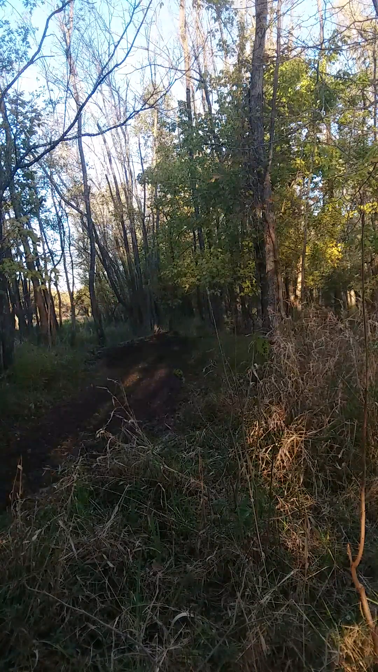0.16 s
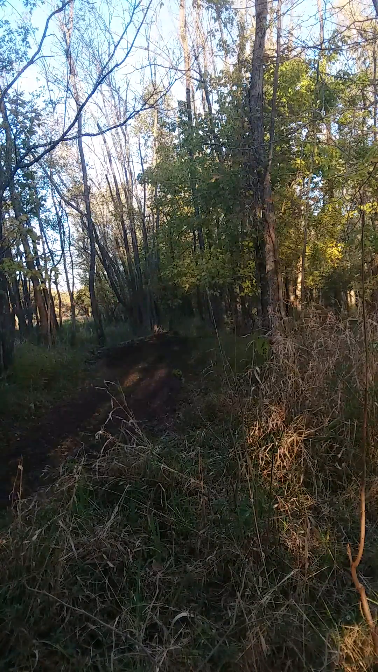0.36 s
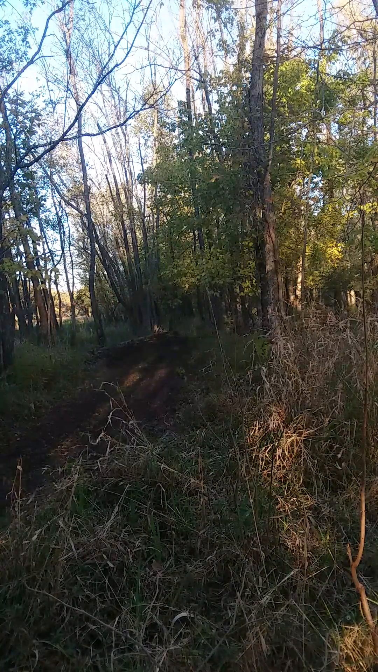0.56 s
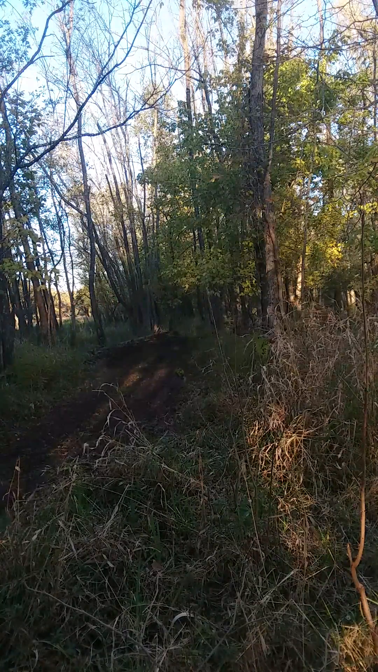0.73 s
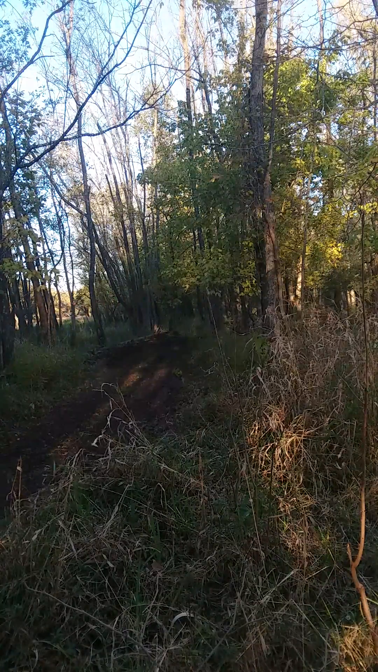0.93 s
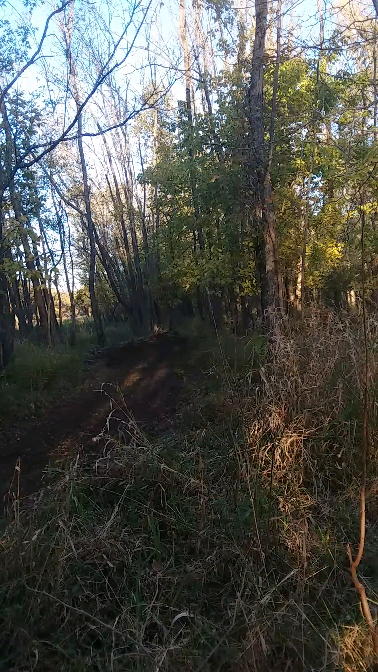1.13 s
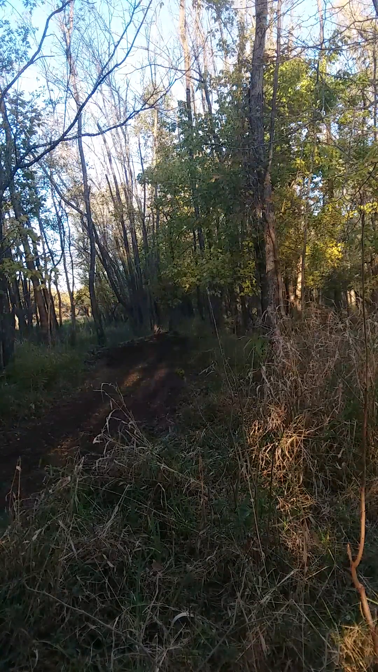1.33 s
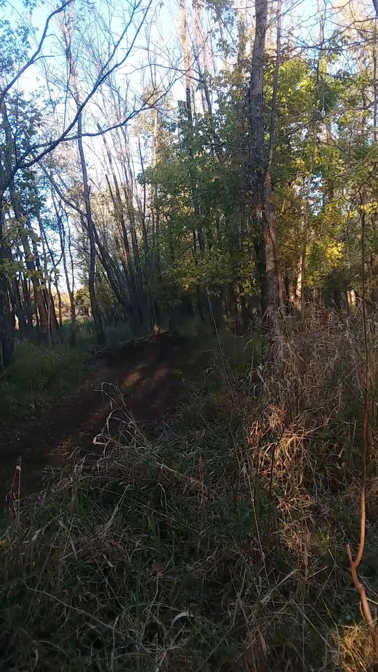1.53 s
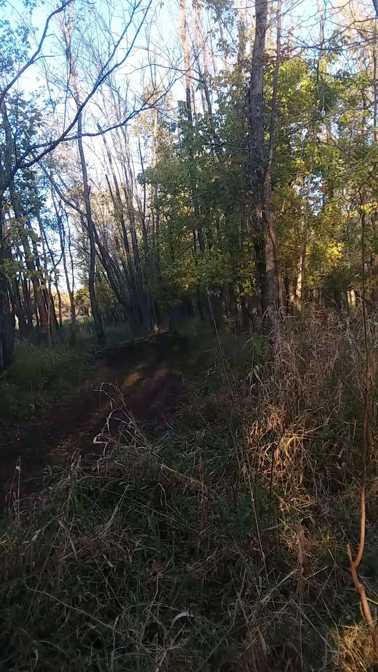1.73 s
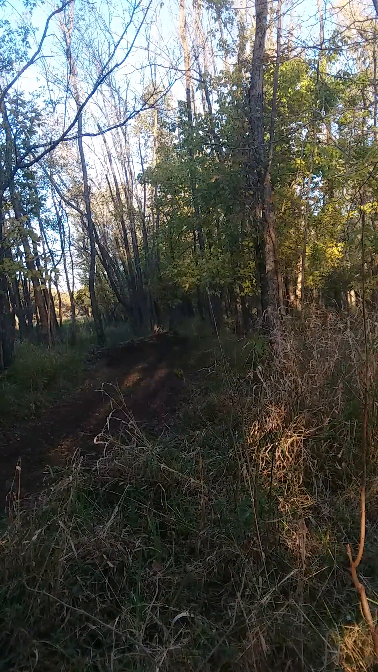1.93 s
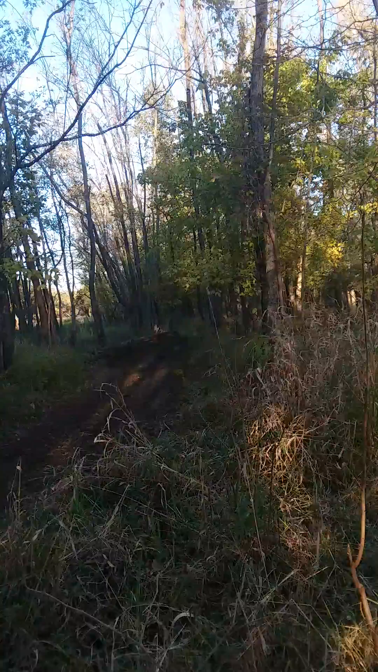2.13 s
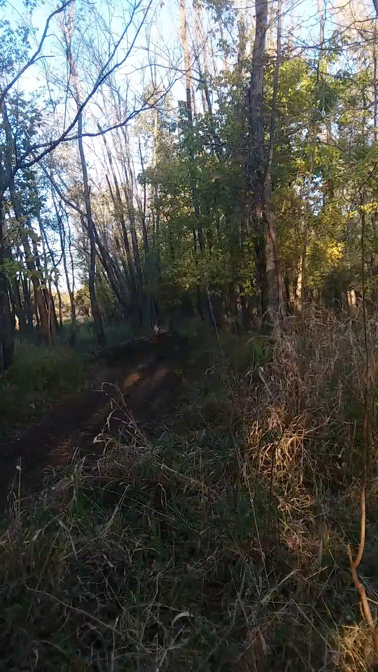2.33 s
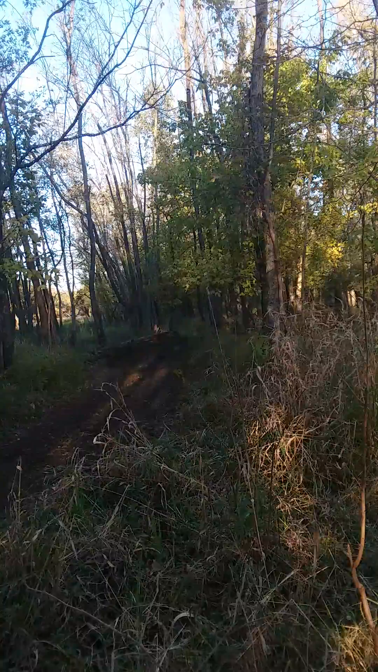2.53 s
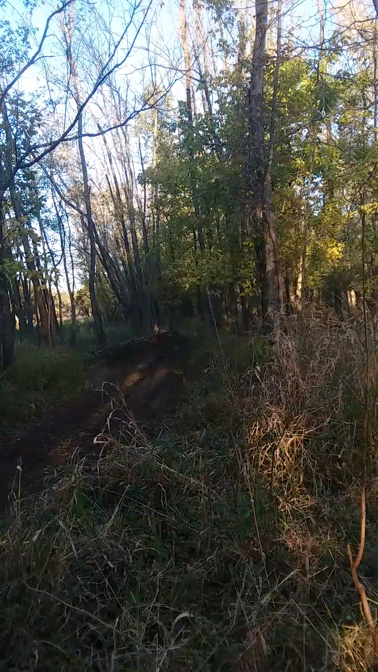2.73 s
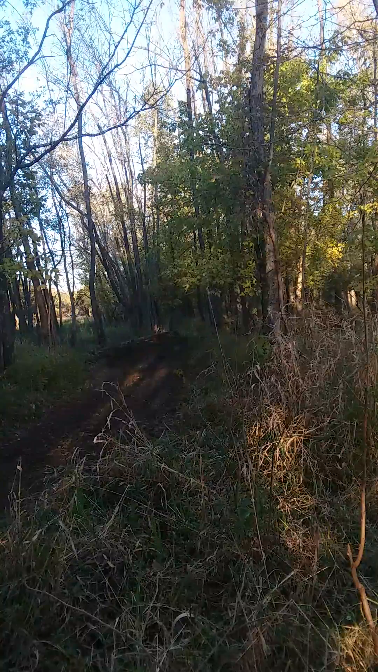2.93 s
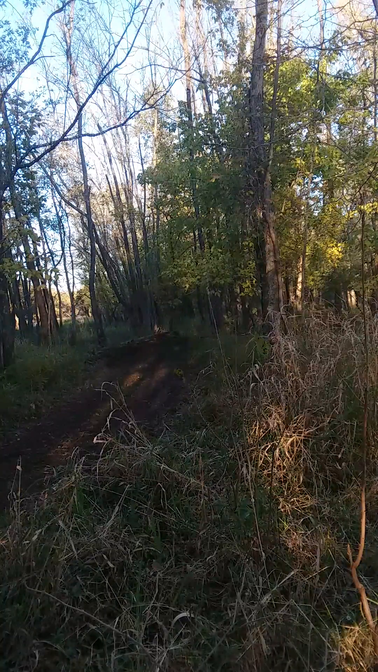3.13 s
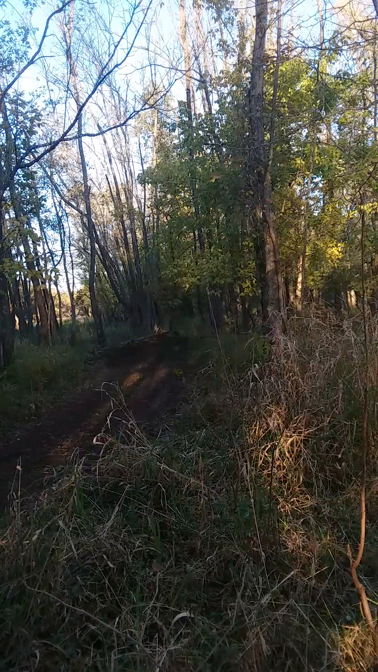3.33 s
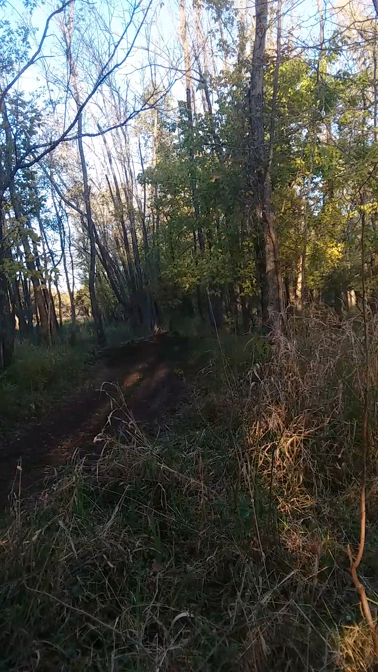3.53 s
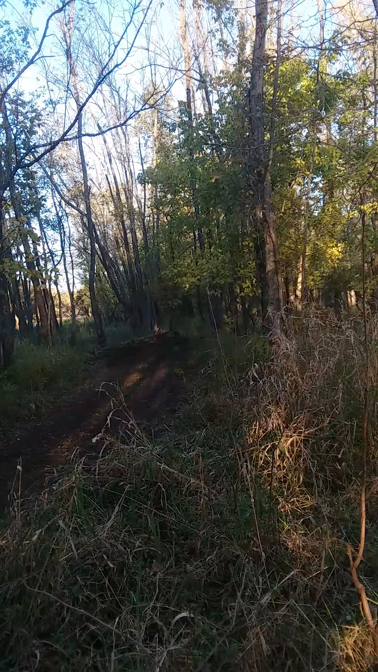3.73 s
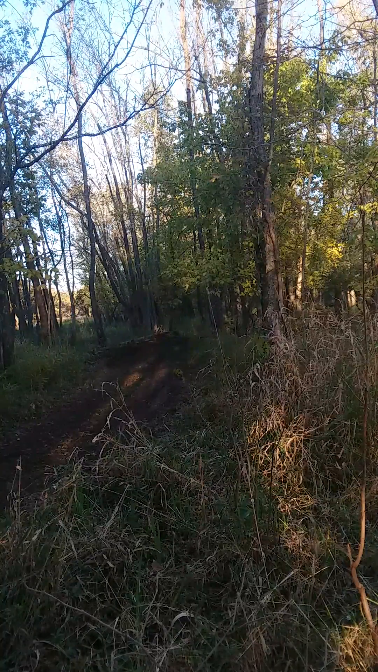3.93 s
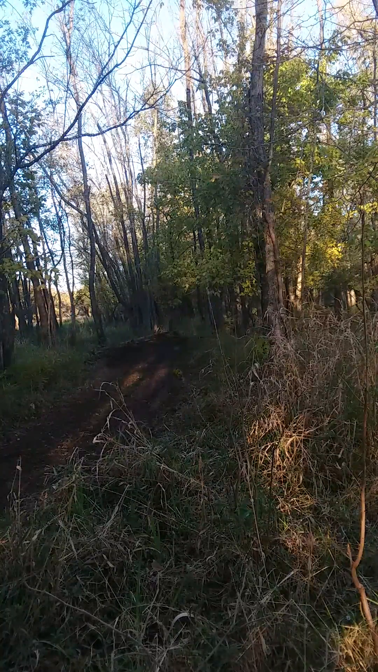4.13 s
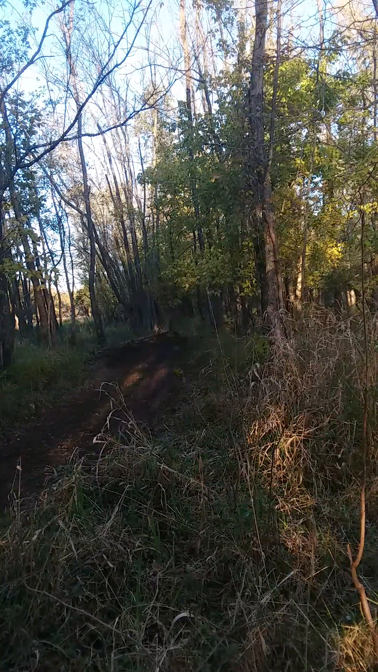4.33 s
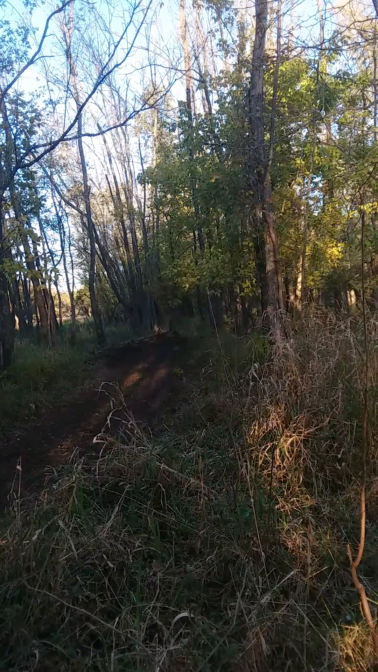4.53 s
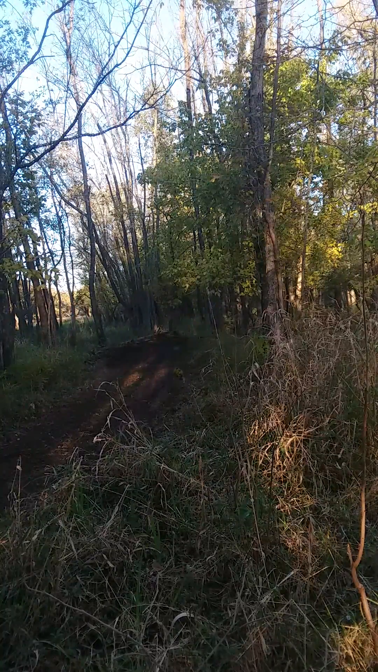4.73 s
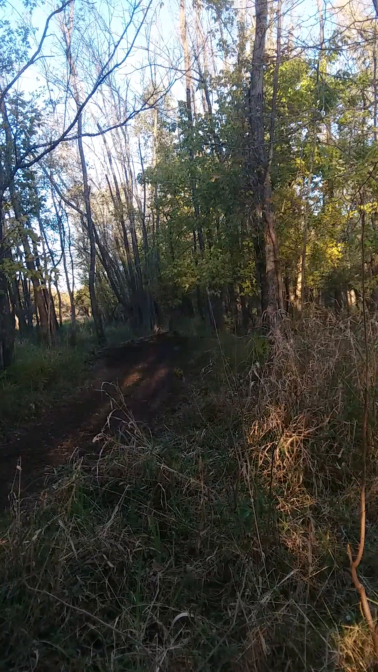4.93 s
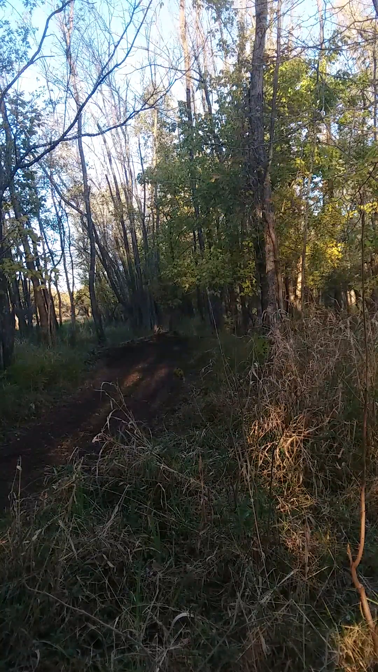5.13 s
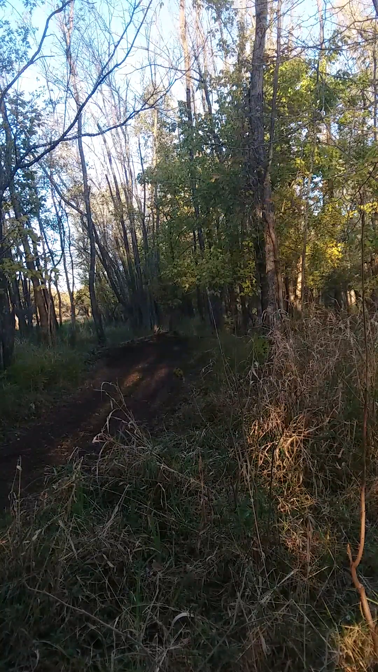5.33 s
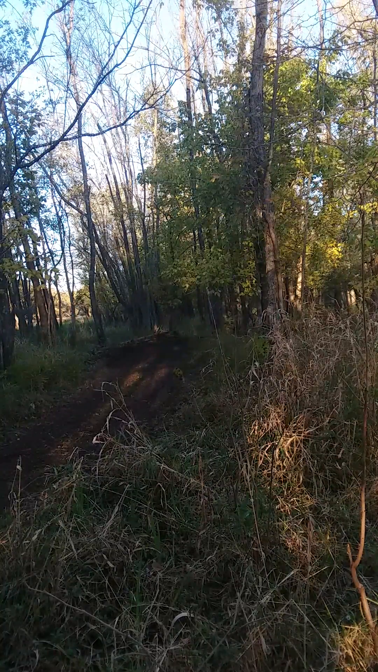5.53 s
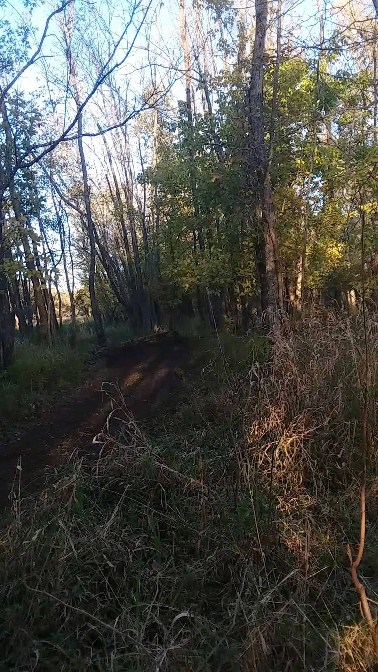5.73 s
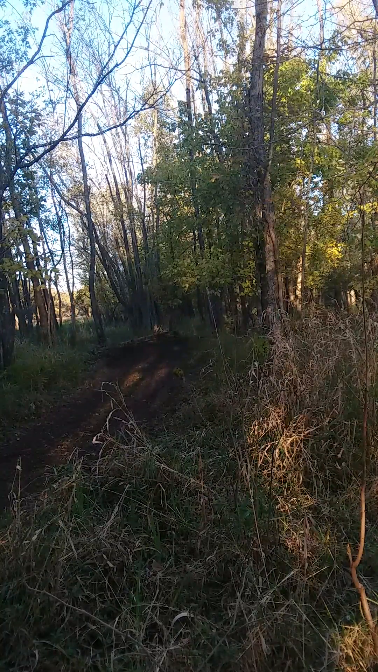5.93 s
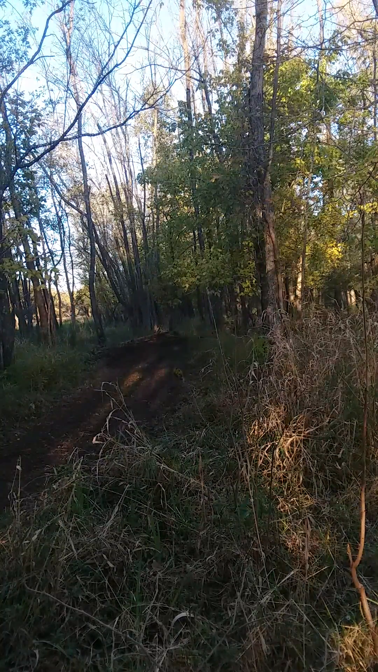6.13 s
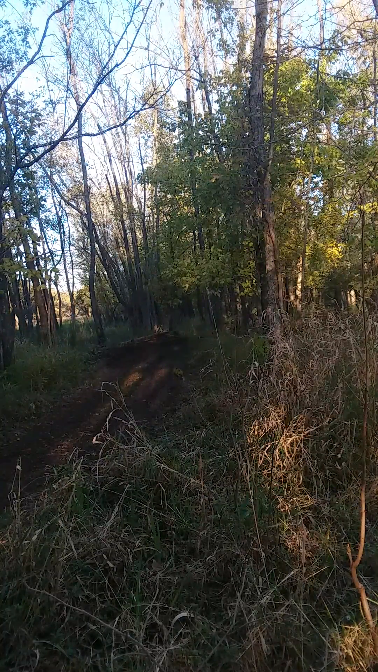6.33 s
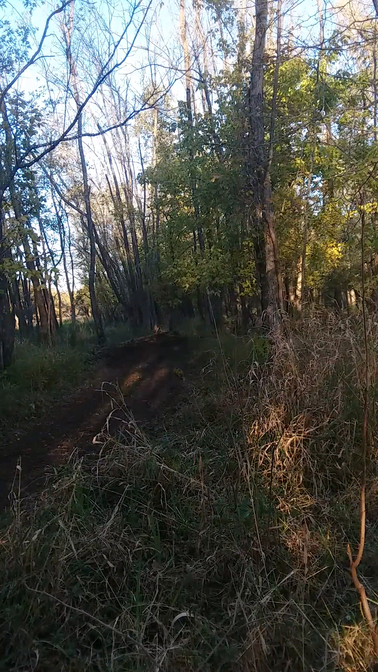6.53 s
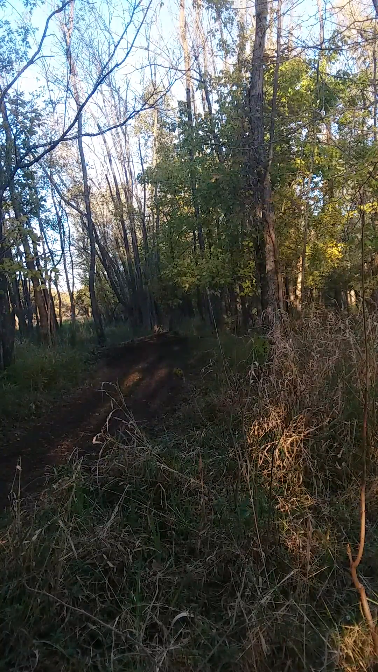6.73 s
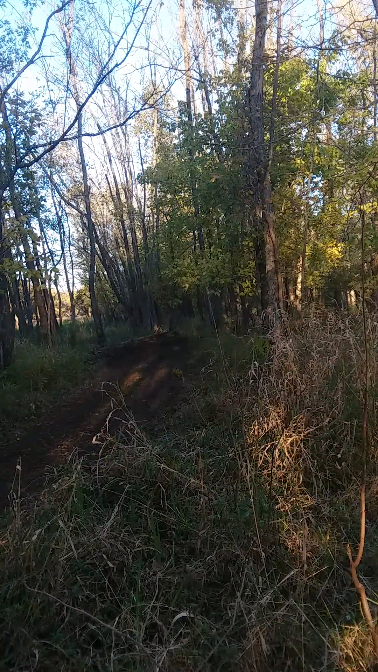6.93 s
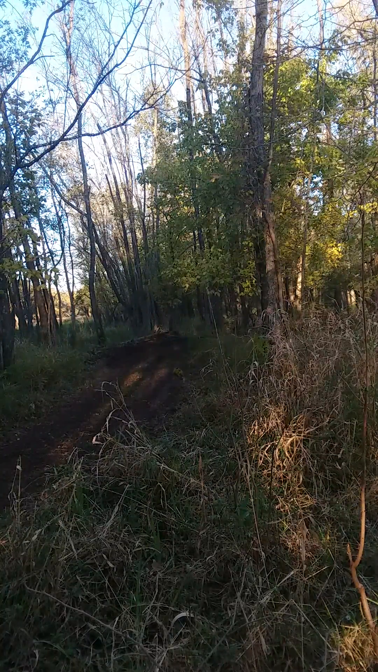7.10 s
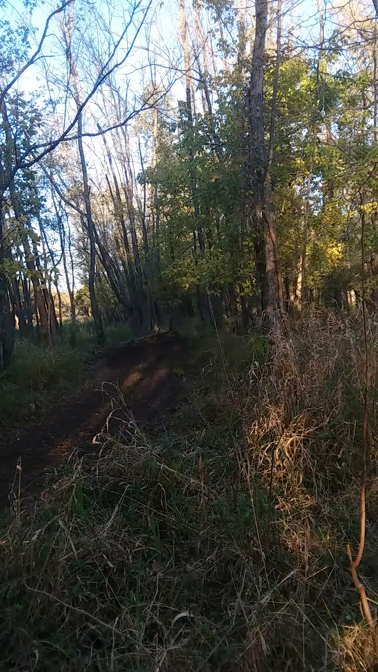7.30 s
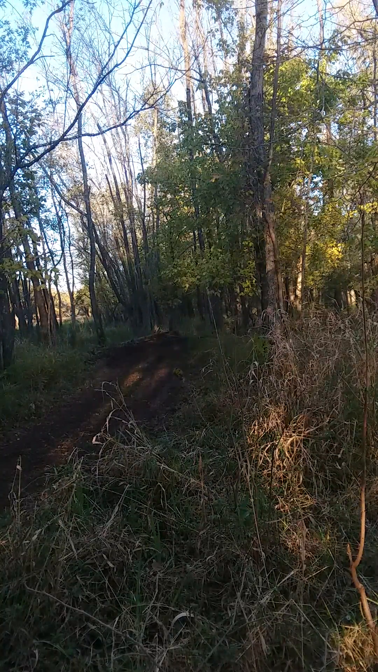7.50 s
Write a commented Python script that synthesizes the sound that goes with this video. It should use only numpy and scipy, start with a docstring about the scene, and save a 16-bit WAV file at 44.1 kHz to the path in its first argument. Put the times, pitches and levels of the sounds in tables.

```python
"""A dirt trail in the woods: a single-cylinder four-stroke quad passes 3 m from a stereo microphone.
Each firing rings the silencer and, under load, barks and spits at the tailpipe; trunks scatter the bark.
Chain, gears and tyres rustle beneath it, and a metal guard rings on the way past. From 2 s the tyres
throw dirt, then the gears whine. By 4 s the quad is 8 m off: the belt squeals, the drive grinds
briefly, and the engine labours on among the trees in bursts of throttle."""
import sys
import numpy as np
from scipy import signal
from scipy.fft import rfft, irfft, next_fast_len
from scipy.io import wavfile
from scipy.ndimage import uniform_filter1d, map_coordinates

SR = 44100
rng = np.random.default_rng(int(sys.argv[2]) if len(sys.argv) > 2 else 0)


def wrap_up_sound(samples):
    """Save the sound to the file named by the first command line argument, as 16-bit audio."""
    columns = np.atleast_2d(samples).T
    # keep every value between -1 and 1, then stretch to whole-number steps
    tamed = np.clip(columns, -1, 1)
    steps = np.round(tamed * 32767).astype(np.int16)
    wavfile.write(sys.argv[1], SR, steps)


N = 337806
TIME = np.arange(N) / SR
NEAR_M, FAR_M = 3, 8.5  # from the microphone: on the trail, in the trees
CRUISE_RATE = 25  # firings per s


def from_db(db):
    """Decibels to gain."""
    return 10 ** (np.asarray(db) / 20)


def curve(rows, at=TIME):
    """The columns of a table at the given times."""
    times, *columns = np.transpose(rows)
    return [np.interp(at, times, column) for column in columns]


def at_hz(points, hz):
    """Read a spectrum on a log-frequency axis."""
    f, value = np.transpose(points)
    return np.interp(np.log(hz + 1), np.log(f), value)


def colour(x, spectrum, size=4096):
    """Minimum-phase filter of unit energy, shaped by (f/Hz, level/dB) and falling away at both ends."""
    hz = np.arange(size // 2 + 1) * SR / size + 1
    ends = 1 / np.sqrt((1 + (spectrum[0][0] / hz) ** 6) * (1 + (hz / spectrum[-1][0] / 1.2) ** 8))
    cepstrum = irfft(np.log(from_db(at_hz(spectrum, hz)) * ends + 1e-5))
    cepstrum[1:size // 2] *= 2
    cepstrum[size // 2 + 1:] = 0
    response = irfft(np.exp(rfft(cepstrum)))
    return signal.fftconvolve(x, response[None] / np.linalg.norm(response), axes=-1)[:, :N]


# how alike the microphone's two sides are: f/Hz, correlation
LIKENESS = [(100, 1), (300, 1), (600, 0.98), (1200, 0.89), (2500, 0.53), (5000, 0.086), (15000, 0.34)]

def stereo_noise():
    """White noise whose two sides are alike in the bass and part ways in the treble."""
    size = next_fast_len(N)
    mid, side = rfft(rng.standard_normal((2, size)))
    alike = np.clip(at_hz(LIKENESS, np.arange(len(mid)) * SR / size), 0, 1)
    sides = np.sqrt((1 + alike) / 2) * mid + np.sqrt((1 - alike) / 2) * side * [[1], [-1]]
    return irfft(sides, size)[:, :N]


def drift(per_s):
    """Random wander between points of spread 1."""
    return np.interp(TIME * per_s, np.arange(8192), rng.standard_normal(8192))


def add(track, t, sound):
    """Mix a sound into a track at t seconds."""
    start = int(np.clip(t * SR, 0, N - 1))
    track[start:start + len(sound)] += sound[:N - start]


# spells of engine sound: bursts of throttle, and two quieter overruns with the throttle snapped shut
# starts t/s, ends t/s, pipe sharpening by hot gas/share, boom level/dB, header level/dB,
# bark level/dB, bark f/Hz, spit level/dB, gear noise level/dB (levels relative)
SPELLS = [(-.2, 0.368, 0.15, -16, -9.5, -38, 840, -55, 2.5),
          (0.316, 0.79, .14, -16, -7.5, -28.5, 900, -43.5, 3),
          (0.79, 0.954, 0.32, -17, -6, -21, 940, -32.5, 3),
          (1.034, 1.21, 0.33, -18, -0.5, -21.5, 1060, -39, 2),
          (1.256, 1.893, 0.074, -17.5, -21.5, -27.5, 1360, -45.5, 1.5),
          (1.99, 2.28, 0.074, -17.5, -7.5, -17.5, 2640, -38.5, -2),
          (2.28, 2.59, -.02, -18.5, -4, -36, 1900, -50, -1.5),
          (2.624, 3.05, 0.031, -19.5, -17.5, -44, 1700, -66, -0.5),
          (3.151, 3.25, 0.031, -18.5, -3.5, -26.5, 1640, -56, -1.5),
          (3.925, 4.15, -0.053, -17, -6.5, -20.5, 1800, -36, 2.5),
          (4.77, 5.222, 0.18, -15.5, -5.5, -21, 2000, -43.5, 2),
          (5.22, 5.5, 0.15, -16, -5.5, -39, 1800, -58, 0.5),
          (5.497, 5.733, .15, -14, -13, -32, 1750, -58, 2),
          (5.725, 6.132, 0.028, -19.5, -8.5, -28.5, 1630, -41.5, 4.5),
          (6.191, 6.359, 0.18, -13.5, -7.5, -17.5, 1420, -58, 1),
          (6.409, 6.605, 0.031, -20.5, -13.5, -40, 1600, -73, -6.5),
          (6.65, 7.37, 0.17, -15.5, -6.5, -18.5, 1660, -45, 3.2),
          (7.553, 7.7, 0.1, -12.5, -24, -25, 1570, -41, 8.5)]
# between spells: the same columns without the two times
COASTING = (0, -18.5, -8, -39.5, 1600.5, -57, -1)

def engine_state(at, rise_s=.1, fall_s=.16):
    """The engine swings from coasting into each spell and back."""
    state = np.array(COASTING, float)[:, None] + np.zeros_like(at)
    for starts, ends, *spell in SPELLS:
        held = np.clip(np.minimum((at - starts) / rise_s, 1 - (at - ends) / fall_s), 0, 1)
        state = state + held * (np.array(spell)[:, None] - state)
    return state


def pipe(fired, force_db, tunings, modes, lead_s):
    """Each gas pulse rings a pipe's modes; the running power is evened."""
    ringing, age = np.zeros(N), np.arange(7000) / SR
    hz, width, weight = np.transpose(modes)[:, :, None]
    fading = weight * np.exp(-np.pi * width * age)
    for t, force, tuning in zip(fired, from_db(force_db), tunings):
        add(ringing, t - lead_s, force * (fading * np.sin(2 * np.pi * tuning * hz * age)).sum(axis=0))
    power = uniform_filter1d(uniform_filter1d(ringing ** 2, size=5000), size=5000)
    return ringing / np.sqrt(np.abs(power) + 1e-9)


# modes of silencer and header pipe, before tuning: f/Hz, width/Hz, signed strength
SILENCER_MODES = [(66, 33, 0.29), (100.6, 31, 1.17), (138.7, 13.2, -2)]
HEADER_MODES = [(205.7, 34, -2.2), (238.4, 12, 0.042), (276, 35, 0.37), (400, 100, 0.067)]
# the header rings higher at the start: t/s, further factor on its mode frequencies
HEADER_TUNING = [(0, 1.47), (.3, 1.35), (.55, 1.136)]

def boom(fired, rate, pop_db, cold_tuning=0.8395, hunting_rate=19.2, hunting_span=4.5):
    """Silencer and header ring over a low rumble, rising in pitch as the gas gets hotter."""
    force_luck, header_luck, tuning_luck = rng.standard_normal((3, len(fired)))
    # just above idle the mixture burns unevenly
    hunting = np.clip(1 - abs(np.interp(fired, TIME, rate) - hunting_rate) / hunting_span, 0, 1)
    force_db = pop_db + (1.5 + 3 * hunting) * force_luck
    sharpening = engine_state(fired)[0]
    tuning = cold_tuning * (1 + sharpening) * (1 + 0.055 * hunting * tuning_luck)
    header_tuning = tuning * curve(HEADER_TUNING, fired)[0]
    silencer = pipe(fired, force_db, tuning, SILENCER_MODES, lead_s=0.00075)
    header = pipe(fired, force_db + 0.5 * header_luck, header_tuning, HEADER_MODES, lead_s=0.0004)
    _, boom_db, header_db, *_ = engine_state(TIME)
    gain = from_db(boom_db) * np.sqrt(rate / CRUISE_RATE)  # more firings, more power
    return gain * (from_db(0.87) * silencer + from_db(header_db - 1.54) * header + rumble())


# colour of the exhaust's rumble: f/Hz, relative level/dB
RUMBLE_SPECTRUM = [(20, -20), (38, -42), (55, -20.5), (80, -5.5), (125, -7.5), (180, -7.5), (280, -13),
                   (400, -28), (700, -59)]

def rumble():
    """Low exhaust noise beneath the pipe's notes."""
    return from_db(-11.5) * colour(stereo_noise(), RUMBLE_SPECTRUM)


def bite(fired, peak_db=3.5, fade_s=0.093):
    """Extra bark in dB, dying away after the start of each spell."""
    starts = np.sort([row[0] for row in SPELLS])
    since = fired - starts[np.maximum(np.searchsorted(starts, fired) - 1, 0)]
    return peak_db * np.exp(-abs(since / fade_s))


# colour of the tailpipe's bark: f/Hz, relative level/dB
BARK_SPECTRUM = [(200, -26), (480, 5), (650, -6), (880, 1.5), (1250, 0.5), (1900, -0.5), (3000, -0.5),
                 (4200, -11.5), (6000, -17.5), (9000, -28)]

def bark(fired, pop_db, uneven_db=1.8, puff_s=0.0035, shock_s=0.000072, width_hz=600):
    """The exhaust valve opens: a one-sided shock front, and a puff of turbulence rings the tailpipe."""
    rings, fronts, age = np.zeros(N), np.zeros(N), np.arange(700) / SR
    bark_db, ring_hz = engine_state(fired)[3:5]
    level_db = bark_db + bite(fired) + pop_db + uneven_db * rng.standard_normal(len(fired)) - 12.5
    pitches = ring_hz * (1 + 0.14 * rng.standard_normal(len(fired)))
    envelope = np.exp(-age / puff_s) * (1 - np.exp(-age / 0.000088))
    shock = np.exp(-((age - .0008) / shock_s) ** 2)
    wake = 0.58 * np.exp(-((age - .0011) / 0.00034) ** 2)
    radius = np.exp(-np.pi * width_hz / SR)  # of the resonator's poles
    zeros = np.array([1, 0, -1]) * (1 - radius ** 2) / 2
    for t, db, hz in zip(fired, level_db, pitches):
        puff = rng.standard_normal(len(age)) * envelope
        poles = [1, -2 * radius * np.cos(2 * np.pi * hz / SR), radius ** 2]
        ring = signal.lfilter(zeros, poles, puff) + 0.17 * puff
        add(rings, t - .0002, from_db(db) * ring / np.sqrt(np.mean(ring ** 2)))
        add(fronts, t, -3.4 * from_db(db - 2.5) * (shock + wake))
    return colour(rings[None], BARK_SPECTRUM) + fronts


# colour of the tailpipe's spit: f/Hz, relative level/dB
SPIT_SPECTRUM = [(3000, 9), (5000, 2.5), (6500, -3), (8100, 0), (9500, -10.5), (11500, -8), (13700, -9.5),
                 (16000, -17)]

def spit(fired, fade_s=0.0074, uneven_db=2):
    """A short hiss of gas leaves the tailpipe at each firing."""
    strength = from_db(uneven_db * rng.standard_normal(len(fired)))
    latest = np.maximum(np.searchsorted(fired, TIME) - 1, 0)
    puffs = strength[latest] * np.exp(-abs(TIME - fired[latest]) / fade_s)
    spit_db = engine_state(TIME)[5]
    return colour(stereo_noise() * puffs * from_db(spit_db + 9), SPIT_SPECTRUM)


def woods(x, t60_s=0.47, first_s=0.0049, echoes_per_s=900, size=26000):
    """Sparse echoes from trunks and ground, partly shared by the microphone's two sides."""
    age = np.arange(size) / SR
    echoes = rng.standard_normal((3, size)) * (rng.random((3, size)) < echoes_per_s / SR)
    echoes *= from_db(-60 * age / t60_s) * (age > first_s) * (1 + 2 * np.exp(-age / 0.0026))
    response = echoes[:2] + echoes[2]
    response /= np.linalg.norm(response, axis=1, keepdims=True)
    return signal.fftconvolve(x, response, axes=-1)[:, :N]


# single pops of late-burning fuel: t/s, extra boom level/dB, extra bark level/dB
POPS = [(.908, -2.5, 4), (1.047, 4, 2), (1.112, 2, 5), (1.323, 1, 8), (2.074, 0, 5), (2.378, 9.5, 1),
        (2.421, 0, 12.5), (2.706, 8, 11), (3.0, 10, -4), (3.1, 10, -4), (3.205, 9, -3.5), (3.553, 7, 3),
        (3.788, 3, 0), (4.253, 4, 1.5)]

def exhaust(rate, cycle, jitter_s=.00015):
    """One firing in the middle of each engine cycle: boom, bark, spit and the bark's echo."""
    fired = np.interp(np.arange(.5, cycle[-1]), cycle, TIME)
    fired += jitter_s * rng.standard_normal(len(fired))
    pop_db = np.zeros((len(fired), 2))
    for t, *extra_db in POPS:
        pop_db[np.argmin(abs(fired - t))] = extra_db
    booms = boom(fired, rate, pop_db[:, 0])
    barks = bark(fired, pop_db[:, 1])
    return booms + barks + spit(fired) + from_db(-9.5) * woods(barks)


# clatter close by, clatter from the trees, and hiss: f/Hz, relative level/dB
CLATTER_NEAR = [(180, -16), (300, -7), (393, -12), (504, -16.5), (835, -17.5), (1030, -21), (1220, -17.5),
                (1320, -20.5), (1880, -19), (2620, -26), (3680, -27.5), (5000, -41), (6500, -92),
                (11000, -120)]
CLATTER_FAR = [(220, -5.5), (350, -0.5), (480, 0.5), (600, -6.5), (780, -5.5), (1100, -4), (1700, -1),
               (2300, -8.5), (3100, -8.5), (4000, -14.5), (5000, -16), (6500, -31)]
HISS_SPECTRUM = [(3000, -16), (4500, -1), (6300, -2), (8200, -0.5), (9500, -13), (11000, -9.5),
                 (13500, -7.5), (16000, -12)]
# the tyres spin and throw dirt: t/s, extra level/dB
WHEELSPIN = [(1.9, -0.5), (2.1, 8), (2.3, 4), (2.45, 13), (2.7, 7.5), (2.95, 0.5)]

def running_gear(rate, distance, clatter_loss_db_per_m=0.67, hiss_loss_db_per_m=0.57):
    """Valve gear, chain and tyres: grainy noise that grows with speed; undergrowth soaks it up."""
    effort_db = .5 * (rate - CRUISE_RATE) + engine_state(TIME)[-1] + curve(WHEELSPIN)[0]
    beyond_m = distance - NEAR_M
    close = np.clip(1 - beyond_m / (FAR_M - NEAR_M), 0, 1)
    grain = from_db(2.5 * drift(450))
    near = np.sqrt(close) * colour(stereo_noise() * grain, CLATTER_NEAR)
    far = np.sqrt(1 - close) * colour(stereo_noise() * grain, CLATTER_FAR)
    clatter = from_db(-33.5 - clatter_loss_db_per_m * beyond_m) * (near + far)
    hiss = colour(stereo_noise() * from_db(2 * drift(600)), HISS_SPECTRUM)
    hiss *= from_db(-48.5 - hiss_loss_db_per_m * beyond_m)
    return from_db(effort_db) * (clatter + hiss)


# shaking of the guard as the quad passes the microphone: t/s, level/dB
GUARD_SHAKE = [(0, -53), (.4, -36), (.7, -43), (.92, -29), (1.05, -49), (1.4, -48), (1.8, -77)]

def guard():
    """Vibration shakes two narrow modes of a sheet-metal guard."""
    shaken = stereo_noise() * from_db(curve(GUARD_SHAKE)[0])
    return colour(shaken, [(700, -22), (805, -9.5), (835, 9), (865, -6), (1050, -17),
                           (1250, -18), (1290, 10), (1330, -22), (1550, -33)])


# gear whine, 6 to 8 m off: t/s, f/Hz, relative level/dB
GEAR_WHINE = [(2.5, 3310, -55), (2.75, 3070, -40), (3.0, 3050, -74), (3.5, 3200, -69), (3.9, 3040, -49),
              (4.3, 3170, -75), (4.55, 3330, -52), (4.78, 3200, -55), (4.9, 3230, -70)]

def gear_whine(cycle, swing=0.026, waver=0.0132, chirp_db=5):
    """Gear teeth chirp once a cycle, speeding up at each firing and sagging between."""
    hz, db = curve(GEAR_WHINE)
    hz *= 1 + swing * np.sin(2 * np.pi * (cycle - .6)) + waver * drift(400)
    gain = from_db(db - 11.5 + chirp_db * np.cos(2 * np.pi * cycle))
    return gain * np.sin(2 * np.pi * np.cumsum(hz) / SR)


# the belt, 8 m off: t/s, f/Hz, level/dB
BELT_SQUEAL = [(3.9, 1713, -68), (4.13, 1650, -52), (4.2, 1620, -50), (4.26, 1656, -60), (4.33, 1640, -48),
               (4.4, 1700, -58), (4.48, 1680, -70)]

def belt_squeal():
    """The belt squeals faintly, unsteady in level and pitch."""
    hz, db = curve(BELT_SQUEAL)
    hz *= 1 + 0.0162 * drift(300)
    return from_db(db + 3.4 * drift(170)) * np.sin(2 * np.pi * np.cumsum(hz) / SR)


# the drive grinding, 8 m off: t/s, level/dB
DRIVE_SCRAPE = [(4.825, -74), (4.845, -36.5), (4.872, -33), (4.89, -35), (4.92, -51)]

def drive_scrape(teeth_hz=210, depth_db=4):
    """A brief toothy grind as the drive takes up load."""
    teeth = from_db(curve(DRIVE_SCRAPE)[0] + depth_db * np.sin(2 * np.pi * teeth_hz * TIME))
    spectrum = [(250, 16.5), (700, 4), (1300, -29), (2200, 5), (3500, -1), (6000, -15), (15000, -24)]
    return colour(stereo_noise() * teeth, spectrum)


# engine speed: t/s, firing rate/Hz
FIRING_RATE = [(0.0, 35.1), (0.36, 30.5), (0.77, 28.2), (0.88, 33.0), (1.02, 25.9), (1.09, 30.5),
               (1.46, 25.8), (1.84, 26.3), (2.01, 20.6), (2.1, 26.8), (2.31, 33.3), (2.38, 24.8),
               (2.6, 19.8), (3.46, 20.2), (3.84, 15.1), (4.15, 23.5), (4.31, 15.3), (4.66, 14.9),
               (5.07, 26.3), (5.24, 27.9), (5.46, 21.1), (5.61, 24.7), (5.7, 19.7), (6.03, 26.7),
               (6.2, 17.7), (6.35, 24.9), (6.6, 19.2), (6.69, 19.0), (6.89, 27.5), (7.05, 27.9),
               (7.2, 24.9), (7.35, 26.8), (7.45, 19.7), (7.66, 21.4)]
# along the trail and off among the trees: t/s, distance from the microphone/m
PATH = [(0, 2.85), (1.1, 2.79), (1.6, 4.02), (2.6, 6.15), (3.0, 7.8), (3.8, 8.27), (7.66, 8.27)]

def scene(near_lag_samples=4.8):
    """The quad from the trailside; the left side hears it later, less so as it moves off."""
    rate, = curve(FIRING_RATE)
    distance, = curve(PATH)
    nearness = NEAR_M / distance
    cycle = .475 + np.cumsum(rate) / SR
    quad = nearness * (exhaust(rate, cycle) + running_gear(rate, distance))
    quad += guard() + gear_whine(cycle) + belt_squeal() + drive_scrape()
    left_at = np.arange(N) - near_lag_samples * nearness
    left = map_coordinates(quad[0], [left_at], order=3, mode="nearest")
    return np.array([left, quad[1]])


# the microphone's two ports: f/Hz, left minus right level/dB
PORT_BALANCE = [(100, -.2), (400, 0), (1000, .4), (2200, 1.7), (4400, -.3), (8000, -.2), (13000, -2.4)]

def record(dry, low_cut_hz=45, high_cut_hz=15850):
    """Each microphone port has its own colour and sheds deep bass; the top is cut."""
    size = next_fast_len(N + 4096)
    lean_db = at_hz(PORT_BALANCE, np.arange(size // 2 + 1) * SR / size)
    heard = irfft(rfft(dry, size) * from_db(lean_db * [[.5], [-.5]]), size)[:, :N]
    thin = signal.sosfilt(signal.butter(2, low_cut_hz, "high", fs=SR, output="sos"), heard)
    return signal.sosfilt(signal.ellip(10, .2, 80, high_cut_hz, fs=SR, output="sos"), thin)


dry = scene()
out = record(dry)
wrap_up_sound(out)
```